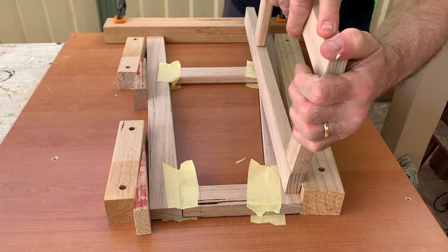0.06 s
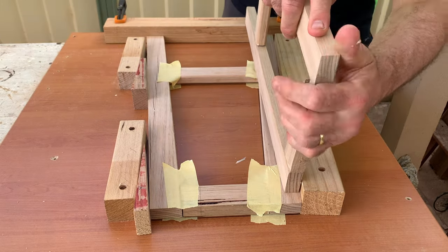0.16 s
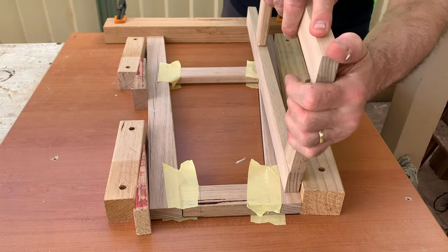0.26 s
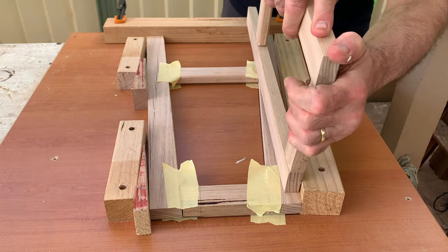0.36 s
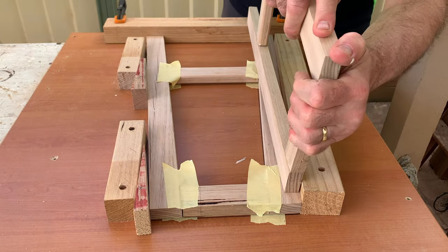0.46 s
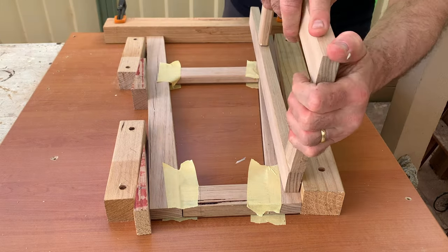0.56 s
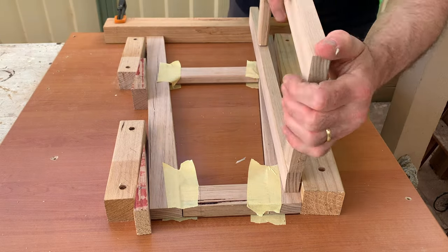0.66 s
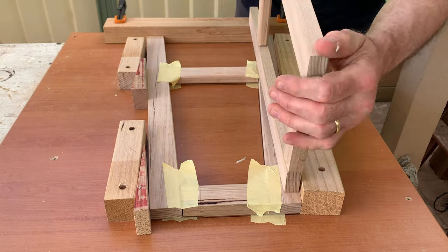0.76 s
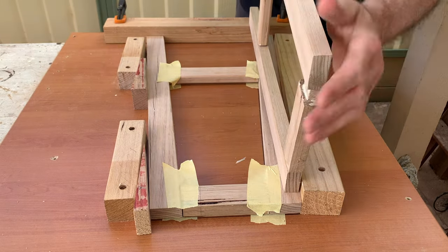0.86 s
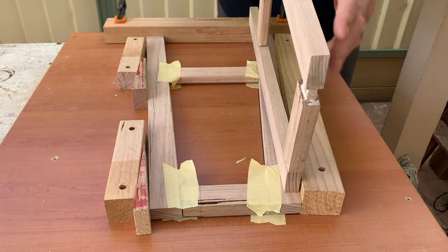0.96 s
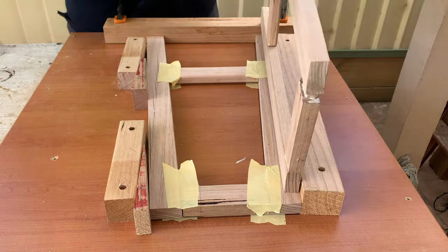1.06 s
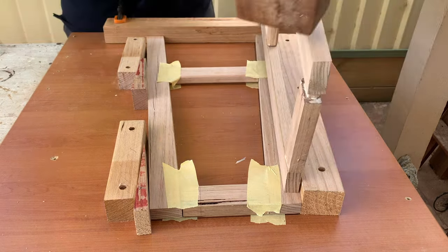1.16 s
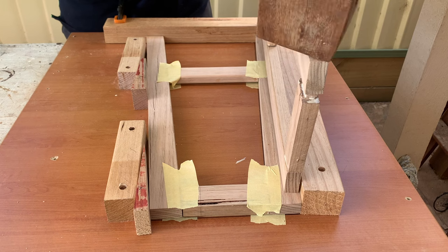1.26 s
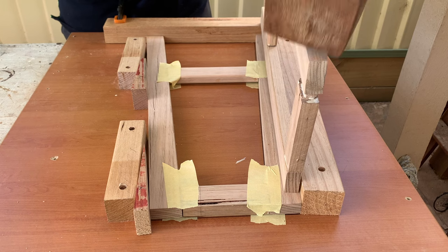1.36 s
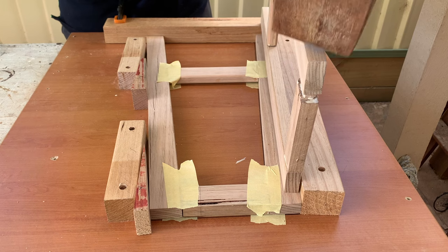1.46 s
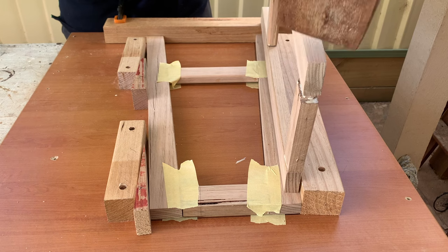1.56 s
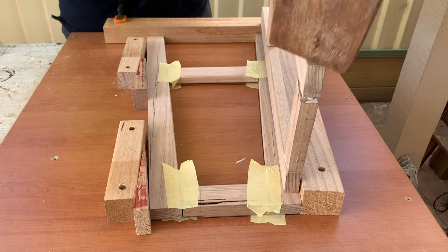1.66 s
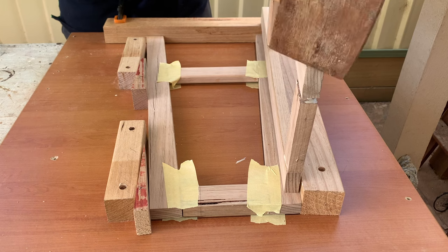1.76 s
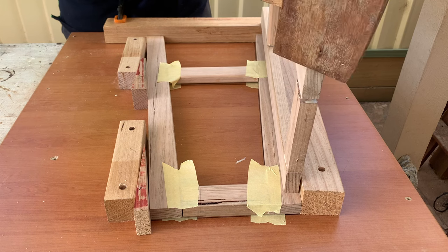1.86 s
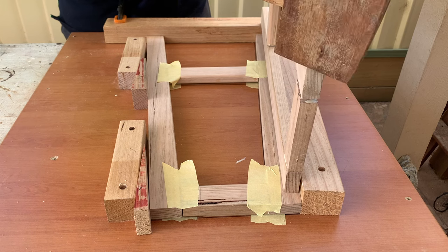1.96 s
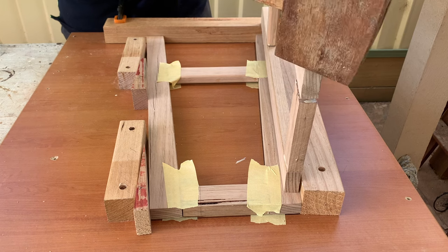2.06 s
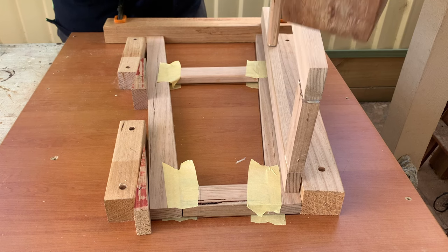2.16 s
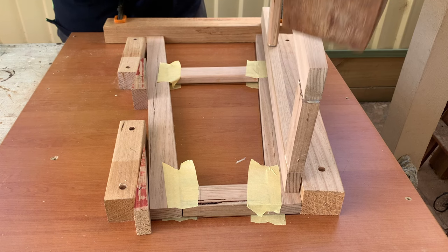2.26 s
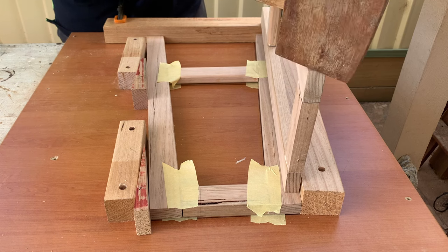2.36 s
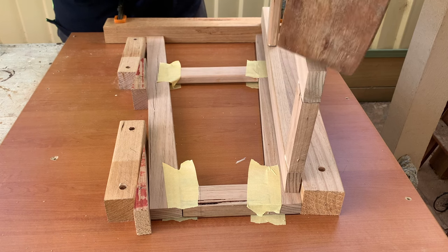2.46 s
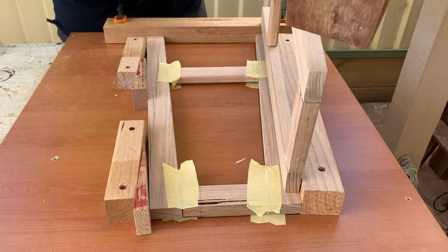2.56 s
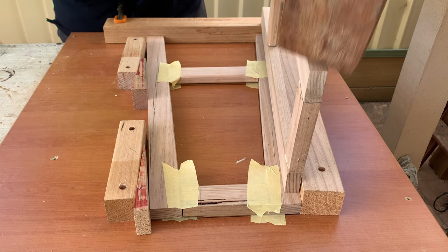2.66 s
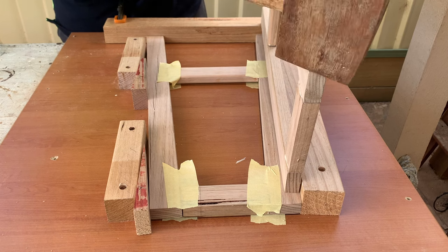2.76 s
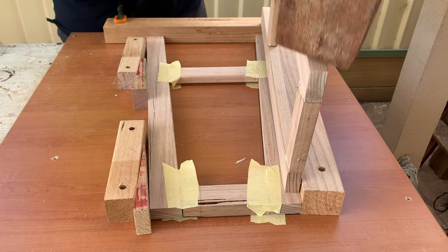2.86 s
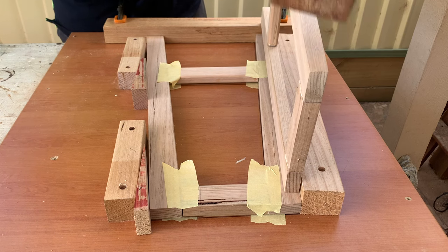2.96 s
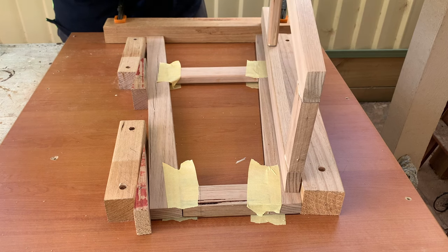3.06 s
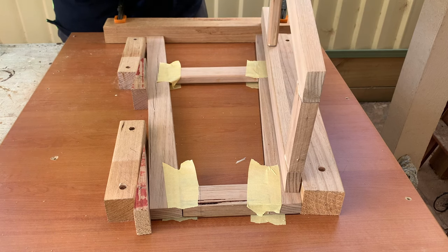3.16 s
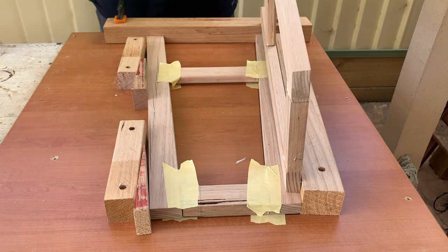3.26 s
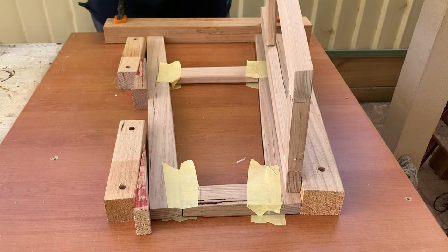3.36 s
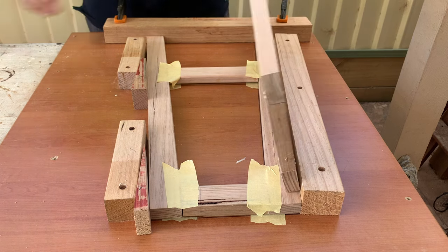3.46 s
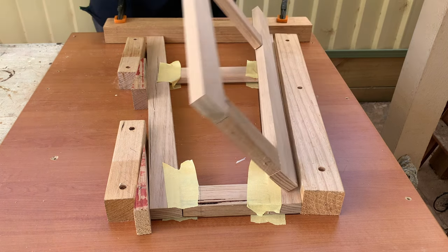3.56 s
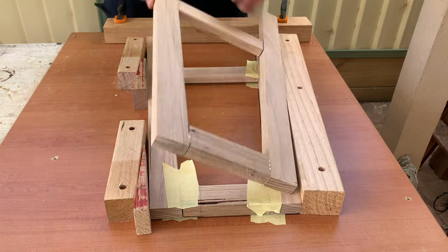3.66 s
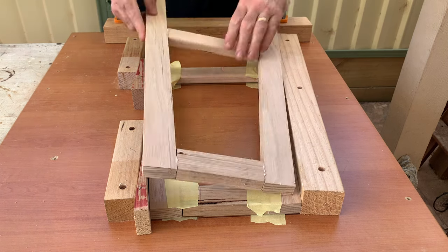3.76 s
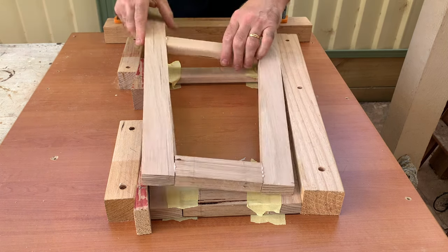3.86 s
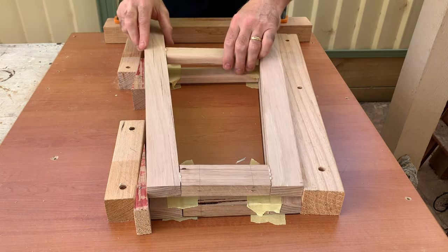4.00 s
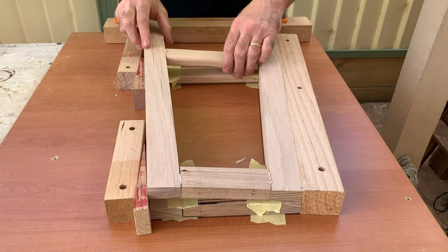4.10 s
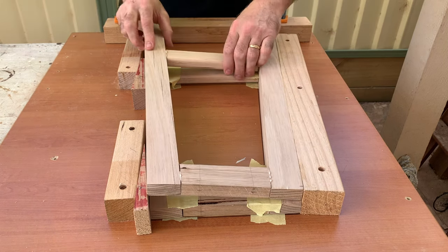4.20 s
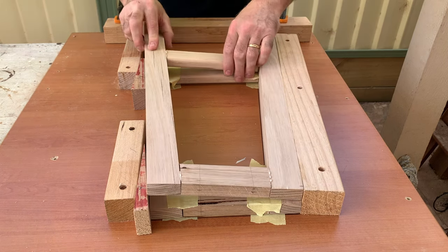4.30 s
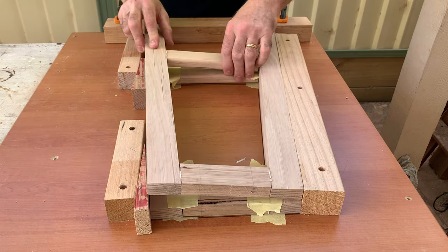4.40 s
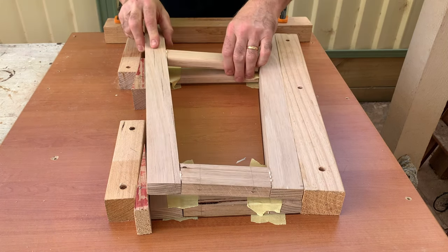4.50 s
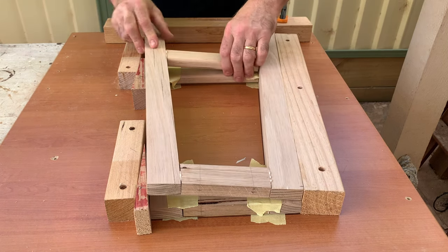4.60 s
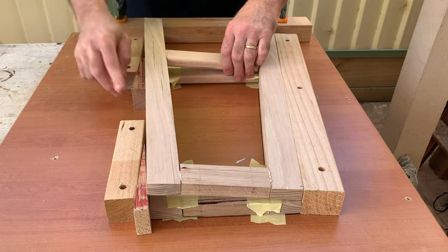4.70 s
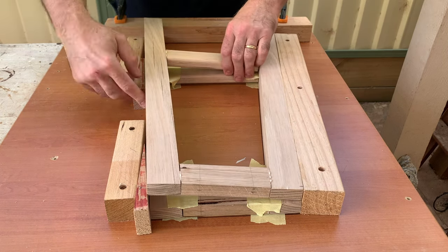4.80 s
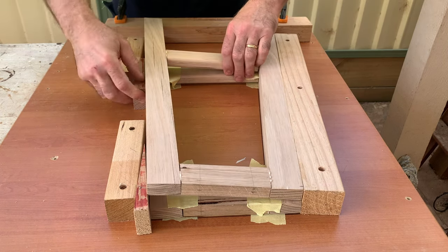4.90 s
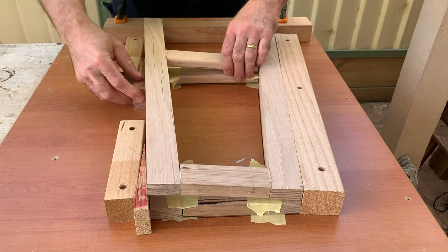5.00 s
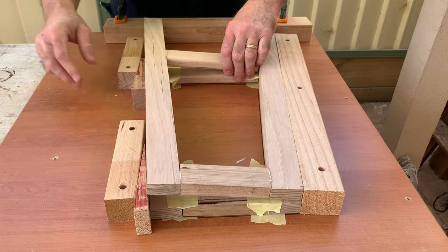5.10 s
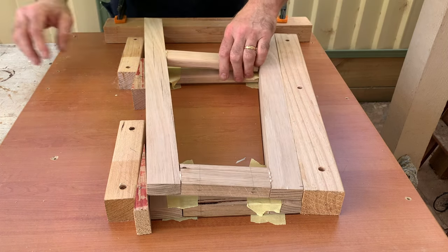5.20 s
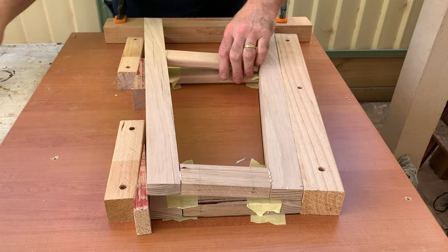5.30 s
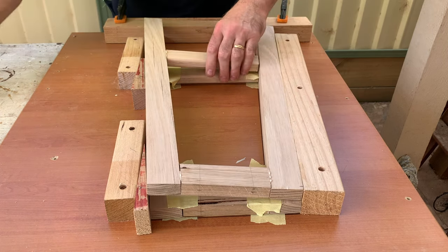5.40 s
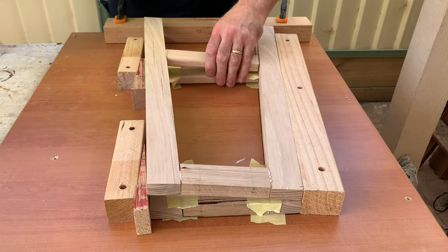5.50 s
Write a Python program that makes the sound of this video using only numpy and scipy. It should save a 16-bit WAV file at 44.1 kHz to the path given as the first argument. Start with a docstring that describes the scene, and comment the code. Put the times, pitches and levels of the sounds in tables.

```python
"""A wooden mallet taps a glued frame home on a bench in an open shed: each blow rings damped modes and a noise wash.
Hands then lay the frame in its jig, with knocks, bright ticks, grainy scrapes and rustle made of shaped noise.
Time runs at double pace (an octave higher, half as long) except around the last two blows, where a low sway
of band-passed noise joins in. Gliding, arching sines whistle as birds over a soft outdoor hush of coloured noise.
"""
import sys
import numpy as np
from scipy import signal
from scipy.io import wavfile
from scipy.ndimage import uniform_filter1d

SR = 44100
rng = np.random.default_rng(int(sys.argv[2]) if len(sys.argv) > 2 else 0)


def master(y):
    """Save y as 16-bit WAV."""
    cut = np.clip(np.atleast_2d(y).T, -1, 1)
    pcm = np.round(cut * 32767)  # scale
    wavfile.write(sys.argv[1], SR, pcm.astype(np.int16))


N = 244314

# Stretch at natural pace: from in seconds, to in seconds.
NATURAL_PACE = (2.2, 3.19)
# Mallet blows. Each row: start in seconds, level in dB, snap in dB, crack in dB, ring length as a factor.
BLOWS = [(1.15, -40.5, -12.5, -8, 1.52), (1.278, -23, -0.5, -6, 1.04), (1.395, -15.5, -2.5, -5, 1.17),
         (1.498, -16.5, 2.5, .5, 1.04), (1.624, -14.5, 2, 3.5, 1.106), (1.741, -13, -1.5, -4.5, 1.22),
         (1.857, -12, -1.5, -5, 1.14), (2.312, -14.5, 2.5, 4.5, 1.126), (2.685, -13.5, -1.5, -4, 1.16)]
# Wood knocking on wood in the hands; the first row is a short click as the pace changes. Each row: start in
# seconds, level in dB, thud in dB, snap in dB, crack in dB, ring length as a factor.
KNOCKS = [(2.194, -39, 7, 4.5, 5, 0.31), (3.284, -5.5, -4.5, -9, -11, 0.98),
          (3.388, -12, 0, -12.5, -0.5, 1.3), (3.41, -12, -2.5, 2, 11, 1.48),
          (3.415, -19.5, -0.5, 8.5, 7, 0.88), (3.439, -25, 6, 1, 0, 0.48),
          (3.526, -26, 4.5, -28, -17, 0.99), (3.573, -56, 13, -37, -22, 4.8),
          (3.67, -29.5, 2, 6.5, -24.5, 1.12), (3.755, -40, 12.5, 3.5, -44, 1.2),
          (3.897, -39.5, -0.5, -5.5, -1, 2), (3.996, -23, -2.5, 3.5, -12, 1.48),
          (4.059, -44, 2.5, -5, -8, 0.59), (4.126, -53, 13.5, 2, 13, 1.2),
          (4.185, -37.5, -3.5, -4, 8, 1.02), (4.227, -45.5, -6, 1, 2, 1), (4.37, -34, 1.5, 9.5, 13, 1),
          (4.404, -22.5, 4, 12, 3.5, 0.83), (4.563, -30.5, 6.5, 12, -6, 0.8),
          (4.616, -45.5, 3, 12, -0.5, 0.69), (4.837, -51.5, 5, 8.5, 9, 1.3),
          (5.341, -60.5, 25, -6.5, 4, 1.1), (5.401, -29.5, 8.5, -21, -1, 1.05),
          (5.453, -30, 1, -6.5, -24, 1.07)]
# Faint bright ticks of nails and splinters. Each row: start in seconds, level in dB.
TICKS = [(0.022, -50), (0.116, -59.5), (0.528, -64), (0.964, -56), (2.889, -71), (5.433, -55.5),
         (5.53, -60)]
# Colour shared by the ticks: thud in dB, snap in dB, crack in dB.
TICK_COLOUR_DB = (-3, 8.5, 32)
# Modes of the frame standing in the jig. Each row: frequency in Hz, width in Hz, level in dB.
UPRIGHT_MODES = [(149, 170, -15), (252.9, 44, 1), (343.3, 34, -4), (493, 37, -13.5), (649.6, 100, 3),
                 (891, 39, -8.5), (1060, 39, -7.5), (1234, 14, -15.5), (1358, 40, 0), (1576, 32, -16),
                 (1655, 82, -11.5), (1974, 55, -5), (2240, 35, -14.5), (2384, 60, -6.5), (2596, 39, 0.5),
                 (2826, 51, -8), (3130, 60, -16), (3340, 40, -9.5), (3678, 65, -6.5), (4136, 34, -12),
                 (5060, 150, -9), (5570, 57, -14), (6400, 100, -24.5), (8000, 85, -17)]
# Modes of the frame loose on the bench. Each row: frequency in Hz, width in Hz, level in dB.
LOOSE_MODES = [(131.4, 130, 1), (177, 16, -10.5), (233, 17, -1.5), (280, 30, 4.5), (360, 33, -0.5),
               (476.2, 9.6, -6), (540, 88, 1.5), (702, 64, 0), (822, 140, -6.5), (921, 25, -3.5),
               (1105, 38, -0.5), (1229, 37, -11.5), (1420, 110, -8), (1633, 52, -6.5), (1810, 58, -5),
               (2110, 44, -6.5), (2524, 27, -8.5), (2753, 70, -8), (3370, 42, -16.5), (3380, 22, -17.5),
               (4150, 70, -16), (4376, 65, -13.5), (5780, 90, -33.5), (6110, 100, -17)]
# Dense ring of bench and walls, frame upright. Each row: frequency in Hz, level in dB per Hz.
UPRIGHT_WASH = [(24, -53.5), (40, -19), (180, -7.5), (237, 1), (503, -10.5), (663, -6), (810, -13.5),
                (2570, -7.5), (2980, -12), (3470, -11.5), (16000, -41.5), (30000, -39)]
# Dense ring, frame loose. Each row: frequency in Hz, level in dB per Hz.
LOOSE_WASH = [(24, -47), (40, -42), (171, 0.5), (363, -1.5), (570, -4.5), (810, -3.5), (1520, -11),
              (4130, -18), (7170, -34.5), (14800, -65), (16000, -33.5)]
# Decay of the wash at ring length 1. Each row: frequency in Hz, time to fall 60 dB in seconds.
WASH_T60 = [(60, 0.49), (160, 0.15), (420, 0.13), (1100, .12), (2900, 0.11), (7700, 0.1), (14000, 0.13),
            (30000, .04)]
# Likeness of left and right in a hit. Each row: frequency in Hz, likeness from 0 to 1.
HIT_LIKENESS = [(30, 0.95), (125, 0.52), (250, 0.99), (500, 0.93), (1000, 0.42), (2000, 0.15), (8000, 0.11)]
# Outdoor hush at double pace. Each row: frequency in Hz, level in dB per Hz.
HUSH_COLOUR = [(18, -43), (30, -20), (98, 0), (245, -5), (822, -19), (1100, -18), (1350, -14.5),
               (2010, -20), (2900, -25.5), (4420, -27.5), (6900, -37), (16000, -57)]
# Likeness of left and right in hush and rustle. Each row: frequency in Hz, likeness from 0 to 1.
HUSH_LIKENESS = [(40, 0.65), (250, 0.69), (1000, 0.19), (4000, 0.69), (12000, 0.11)]
# Faint stir of hands and clothes. Each row: time in seconds, level in dB.
RUSTLE = [(0, -76), (.3, -77), (.9, -76.5), (1.3, -80), (1.9, -67.5), (2.05, -82), (2.19, -69.5),
          (2.21, -105), (3.19, -105), (3.21, -77.5), (3.6, -73), (3.8, -78), (4.1, -77.5), (4.3, -81),
          (4.6, -83), (4.68, -100), (4.85, -82), (5.1, -99), (5.35, -86), (5.54, -79)]
# Spectrum of the rustle. Each row: frequency in Hz, level in dB per Hz.
RUSTLE_COLOUR = [(290, -18.5), (500, 10), (729, 6.5), (795, 12), (1250, -38.5), (4150, -15.5),
                 (8330, -11.5), (16000, -52.5)]
# Short scrapes of wood on wood. Each row: start in seconds, length in seconds, level in dB, centre in Hz.
SCRAPES = [(0.134, 0.1, -82, 4700), (2.074, 0.11, -76.5, 7040), (3.153, 0.052, -79.5, 5130),
           (3.34, 0.044, -64.5, 5470), (3.614, 0.054, -63, 3685), (3.672, 0.048, -62, 7000),
           (3.971, 0.037, -58.5, 3680), (4.026, 0.065, -70, 3500), (4.164, 0.028, -58, 3780),
           (4.357, 0.025, -51, 3000), (4.624, 0.03, -70.5, 2980), (4.771, 0.027, -59.5, 2200),
           (4.865, 0.088, -75.5, 2550), (5.022, 0.014, -77.5, 3460), (5.412, 0.071, -67, 4870)]
# Bird whistles. Each row: start in seconds, length in seconds, start pitch in Hz, glide in Hz, arch in Hz,
# level in dB, loudest point as a share from 0 to 1, blur from 0 to 1.
BIRDS = [(0.32, 0.184, 4474, -41, 3, -70, 0.36, 0.12), (1.133, 0.12, 4180, 117, -44, -68.5, 0.1, 0.23),
         (1.241, 0.16, 5750, -650, 640, -59.5, 0.3, 0.4), (2.076, 0.107, 4600, 400, 58.5, -60.5, .75, 0.14),
         (2.95, 0.2, 2250, -30, -4, -77, 0.3, 0.42), (4.885, .12, 4160, 97, 371.5, -76, 0.6, 0),
         (4.998, 0.047, 3780, -81.5, 2, -76, .3, .1), (5.09, 0.039, 4830, -350, -82, -73, 0.7, 0.5),
         (5.127, 0.083, 4480, 234, 54, -78, .3, 0.2), (5.24, 0.049, 3980, 19.5, 5.5, -78, 0.53, 0),
         (5.295, 0.12, 3530, 672, -58, -74, 0.4, 0.3)]

# Half-octave noise bands: edges and centres
EDGES_HZ = 20 * 2 ** np.arange(0, 9.8, 1 / 2)
BANDS_HZ = np.sqrt(EDGES_HZ[1:] * EDGES_HZ[:-1])

HUSH_DB = -66
TICK_RING = 0.61   # ring length factor
TICK_S, TICK_HZ = 0.0011, 4000   # first touch of the faces: decay time in s, heard above Hz
LUMPS_DB = 2   # single echoes stand out of the wash
SHED_DB, SHED_STRETCH = -20, 2.55   # late echo of the shed: dB against the wash, factor on its decay time
FULL_BLOW_DB, THUD_PER_DB = -13, 0.4928   # weak blows thud more: dB, dB of thud per dB below it
SCRAPE_OCTAVES = 1.14   # spread around the centre
BIRD_ENDS_DB, BIRD_FADE_S = -9, 0.012   # level at the ends of a note; fade in and out
BIRD_ECHO_S, BIRD_ECHO_DB = 0.024, -3.5   # a wall sends each note back
BOOM_DB, BOOM_RISE_S, BOOM_T60_S = -22, 0.01234, 0.31   # deep sway of the bench, dB against its blow
WIND_DB = -76.5
TREBLE_LEAN, TREBLE_LEAN_HZ = 0.19, 5000   # the right channel gets more treble: share, above Hz
LOW_CUT_HZ, CUTOFF_HZ = 69, 16900


def amp(db):
    """Decibel law: the amplitude gain of a level in dB."""
    return 10 ** (np.asarray(db) / 20)


def rms_one(x):
    """Power normalisation: scale to rms 1."""
    return x / np.sqrt(np.mean(x ** 2) + 1e-20)


def at_hz(points, hz):
    """Logarithmic frequency scale: read a (Hz, value) table on a log axis."""
    table = np.array(points)
    return np.interp(np.log(hz), np.log(table[:, 0]), table[:, 1])


def in_time(rows, column):
    """Linear interpolation: one column of a curve at every sample."""
    return np.interp(np.arange(N) / SR, np.array(rows)[:, 0], np.array(rows)[:, column])


def drift(rate):
    """Low-passed noise: a slow random course of spread 1, with its corner at rate in Hz."""
    # worked out at every 40th sample; the first 2000 values let the filter settle
    r = np.exp(-80 * np.pi * rate / SR)
    white = rng.standard_normal(N // 40 + 2002)
    slow = signal.lfilter([1], [1, -2 * r, r * r], white)[2000:]
    return np.interp(np.arange(N) / 40, np.arange(len(slow)), rms_one(slow))


def filtered(x, order, hz, kind):
    """Butterworth response: maximally flat high-pass or band-pass filtering."""
    return signal.sosfilt(signal.butter(order, hz, kind, fs=SR, output="sos"), x)


def noise_bank():
    """Band analysis: half-octave bands of white noise, two unrelated rows each; neighbours unrelated too."""
    white = rng.standard_normal((2, 2, N))
    edges = zip(EDGES_HZ, EDGES_HZ[1:])
    return [filtered(white[k % 2], 2, [low, high], "band") for k, (low, high) in enumerate(edges)]


def spread(pair, alike):
    """Interchannel coherence: left and right from a mid and a side noise."""
    alike = np.clip(alike, 0, 1)
    mid = np.sqrt(1 + alike) * pair[0]
    side = np.sqrt(1 - alike) * pair[1] * [[1], [-1]]
    return (mid + side) / np.sqrt(2)


def spectrum_power(spectrum):
    """Power summation: the power of white noise once its bands are coloured by a spectrum."""
    return np.sum(amp(2 * at_hz(spectrum, BANDS_HZ)) * np.diff(EDGES_HZ))  / (SR / 2)


def pace(s):
    """Time scaling: 1 at double pace, 1/2 at natural pace."""
    return np.where((s > NATURAL_PACE[0]) & (s < NATURAL_PACE[1]), 1 / 2, 1.)


def steady(bank, spectrum, likeness, patchy_db, speed):
    """Coloured noise at each pace, flickering band by band; rms near 1 at double pace before the flicker."""
    out, together = 0, drift(8.4)
    for pair, centre in zip(bank, BANDS_HZ):
        # at natural pace the spectrum sits an octave lower
        level_db = np.where(speed < 1, at_hz(spectrum, 2 * centre) + 4.1, at_hz(spectrum, centre))
        flicker_db = patchy_db * (.7 * together + drift(11))
        out = out + amp(level_db + flicker_db) * spread(pair, at_hz(likeness, centre))
    return out / np.sqrt(spectrum_power(spectrum))


def hush(bank):
    """Stationary broadband noise: the soft outdoor background follows the pace."""
    return amp(HUSH_DB) * steady(bank, HUSH_COLOUR, HUSH_LIKENESS, 1.5, pace(np.arange(N) / SR))


def rustle(bank):
    """Sliding friction: skin and wood slide in clumps of fine grains."""
    grains = rms_one(amp(2.0 * drift(150) + 2.6 * drift(25)))
    noise = steady(bank, RUSTLE_COLOUR, HUSH_LIKENESS, 3.0, np.ones(N))
    return amp(in_time(RUSTLE, column=1)) * grains * noise


def hits(events, modes, wash, bank, modes_db, wash_db, damping, lag_cycles, contact_s,
         grip_s, grip_db, vary_db, tick_db, pan_db):
    """Modal superposition: each hit rings the modes of the wood and a dense wash that dies band by band."""
    out = np.zeros((2, N + SR))
    hz, width, level_db = np.transpose(modes)[:, :, None]
    order = np.arange(len(hz))[:, None]
    # every mode reaches the two channels with its own phase, further apart in the treble
    apart = np.arccos(np.clip(at_hz(HIT_LIKENESS, hz), 0, 1)) * (-1) ** (order // 2)
    phase = np.pi * order   # neighbouring modes start in opposite directions
    chance = rng.standard_normal((len(events), len(modes), 2))
    wash_power = spectrum_power(wash)
    lumps = [amp(LUMPS_DB * drift(60)) for draw in range(4)]
    ticks = filtered(rng.standard_normal((2, N)), 2, TICK_HZ, "high")
    for (s, peak_db, thud_db, snap_db, crack_db, ring), luck in zip(events, chance):
        speed, at = pace(s), round(s * SR)
        # t counts seconds as they pass at double pace
        t = np.arange(min(round(.3 * SR / speed), N - at)) / SR * speed
        span = slice(at, at + len(t))
        colour = [(200, thud_db), (800, 0.023), (2500, snap_db), (8000, crack_db)]
        # the joint rattles loudly until it seats and grips, then the ring drops
        rattle = amp(grip_db * np.exp(-(t / (grip_s * ring)) ** 4))

        # bending waves: the lows arrive later and swell over the contact
        rise = 1 - np.exp(-(t / (contact_s + lag_cycles / hz)) ** 2)
        size = amp(level_db + at_hz(colour, hz) + vary_db * luck[:, :1]) * np.sqrt(width)
        fall = size * rise * np.exp(-np.pi * width * damping * t / ring)
        turn = 2 * np.pi * hz * t + phase + 1.0 * luck[:, 1:]
        ringing = [np.sum(fall * np.sin(turn + side * apart / 2), axis=0) for side in (1, -1)]
        sound = amp(modes_db) * rattle * np.array(ringing)
        sound += amp(tick_db + crack_db) * np.exp(-t / speed / TICK_S) * ticks[:, span]

        for k, (pair, centre) in enumerate(zip(bank, BANDS_HZ)):
            own = centre / speed   # the band's frequency at double pace
            drop_db = -60 * t / (ring * at_hz(WASH_T60, own))
            decay = rattle * amp(drop_db) + amp(SHED_DB + drop_db / SHED_STRETCH)
            swell = 1 - np.exp(-t / (contact_s + lag_cycles / own))
            gain = amp(wash_db + at_hz(wash, own) + at_hz(colour, own)) / np.sqrt(wash_power * speed)
            noise = spread(pair[:, span], at_hz(HIT_LIKENESS, own))
            sound += gain * swell * decay * lumps[k % len(lumps)][span] * noise
        out[:, span] += sound * amp(peak_db + pan_db * np.array([[.5], [-.5]]))
    return out[:, :N]


def hands(bank):
    """Impact excitation of a loose body: knocks and bright ticks ring the frame on the bench."""
    touches = KNOCKS + [(s, db, *TICK_COLOUR_DB, TICK_RING) for s, db in TICKS]
    return hits(touches, LOOSE_MODES, LOOSE_WASH, bank, modes_db=-35.5, wash_db=-14.5, damping=0.84,
                lag_cycles=0.48, contact_s=0.00092, grip_s=0.0084, grip_db=3, vary_db=4.0,
                tick_db=-31.5, pan_db=2.0)


def scrapes(bank):
    """Stick-slip friction: fibres catch and slip as grainy noise around a centre, swelling and fading."""
    out, grains = np.zeros((2, N)), rms_one(amp(2.9 * drift(250)))
    for s, length, level_db, centre_hz in SCRAPES:
        at, along = round(s * SR), np.linspace(0, 1, max(round(length * SR), 2))
        span = slice(at, at + len(along))
        stroke = np.sqrt(np.sin(np.pi * along)) * grains[span]
        shape = np.exp(-(np.log2(BANDS_HZ / centre_hz) / SCRAPE_OCTAVES) ** 2)
        shape = shape / np.sqrt(BANDS_HZ / SR * np.sum(shape ** 2))
        for pair, gain in zip(bank, shape):
            out[:, span] += amp(level_db) * gain * stroke * spread(pair[:, span], 0.1)
    return out


def birds():
    """Frequency modulation: near sines glide and arch; echoes on the way blur pitch and level in each channel."""
    out, waver = np.zeros((2, N)), drift(400)
    flutter = np.array([drift(70), drift(65)])   # each channel has its own
    for s, length, start_hz, glide_hz, arch_hz, level_db, peak, blur in BIRDS:
        at, along = round(s * SR), np.linspace(0, 1, round(length * SR))
        span, blur = slice(at, at + len(along)), np.clip(blur, 0, 1)
        course_hz = start_hz + glide_hz * along + arch_hz * np.sin(np.pi * along)
        hz = course_hz * (1 + .06 * blur * waver[span])
        loudest = np.clip(peak, .05, .95)
        swell_db = np.interp(along, [0, loudest, 1], [BIRD_ENDS_DB, 0, BIRD_ENDS_DB])
        fade = np.minimum(np.minimum(along, 1 - along) * length / BIRD_FADE_S, 1)
        level = fade * amp(level_db + swell_db + 10.0 * blur * flutter[:, span])
        out[:, span] += level * np.sin(2 * np.pi * np.cumsum(hz) / SR + 3.0 * blur * flutter[:, span])
    # the echo comes back with the sides swapped
    return out + amp(BIRD_ECHO_DB) * np.roll(out[::-1], round(BIRD_ECHO_S * SR), axis=1)


def mallet(bank):
    """Impact excitation of a held body: blows ring the frame upright in the jig, weak ones with more thud."""
    blows = [(s, db, THUD_PER_DB * (FULL_BLOW_DB - db), *rest) for s, db, *rest in BLOWS]
    return hits(blows, UPRIGHT_MODES, UPRIGHT_WASH, bank, modes_db=-34, wash_db=-13, damping=0.6,
                lag_cycles=1.0, contact_s=0.00083, grip_s=0.009, grip_db=6.0, vary_db=2.0,
                tick_db=-18.5, pan_db=2.0)


def rumble():
    """Low-frequency sway: wind and the bench after a blow; only natural pace keeps them this low."""
    t = np.arange(N) / SR
    level = amp(WIND_DB + 3.0 * drift(6))
    for s, peak_db, *rest in BLOWS:
        since = np.clip(t - s, 0, None)
        rise = 1 - np.exp(-since / BOOM_RISE_S)
        level = level + amp(peak_db + BOOM_DB - 60 * since / BOOM_T60_S) * rise
    level = uniform_filter1d(level * (pace(t) < 1), size=SR // 50)   # soft edges
    low = filtered(rng.standard_normal((2, N)), 2, [16, 50], "band")
    return level * spread(rms_one(low), 0.66) * amp([[1.9], [-1.9]])


def scene():
    """Linear superposition: blows, knocks and scrapes over hush, rustle, wind and birds."""
    bank = noise_bank()
    # the same noise shifted or reversed in time serves the other layers
    shifted = [np.roll(pair, N // 2, axis=1) for pair in bank]
    reverse = [pair[:, ::-1] for pair in bank]
    background = hush(shifted) + rustle(reverse)
    return background + hands(bank) + scrapes(shifted) + birds() + mallet(bank) + rumble()


def record(dry):
    """Band limiting: the right channel is brighter, the deepest bass is lost, the top is cut."""
    treble = filtered(dry, 1, TREBLE_LEAN_HZ, "high")
    leaning = dry + TREBLE_LEAN * treble * [[-1], [1]]
    thinned = filtered(leaning, 2, LOW_CUT_HZ, "high")
    return signal.sosfilt(signal.cheby2(12, 70, CUTOFF_HZ, fs=SR, output="sos"), thinned)


dry = scene()
out = record(dry)
master(out)
```